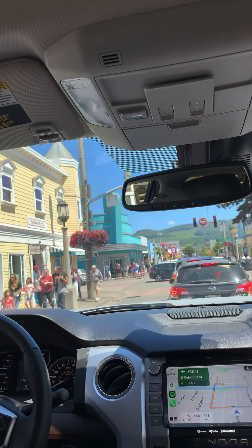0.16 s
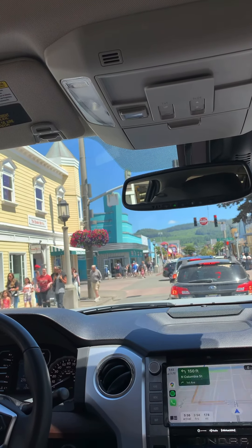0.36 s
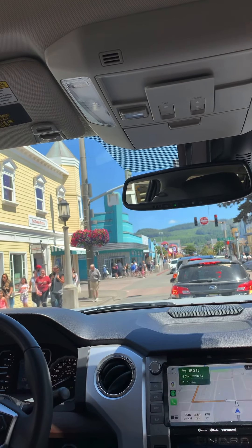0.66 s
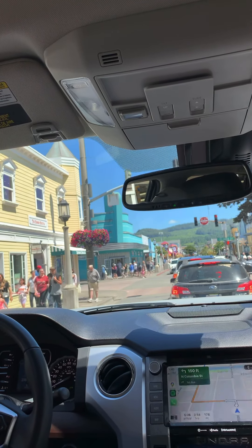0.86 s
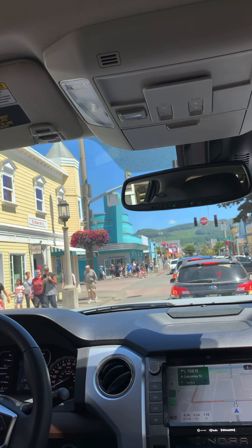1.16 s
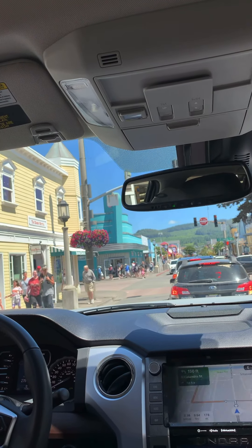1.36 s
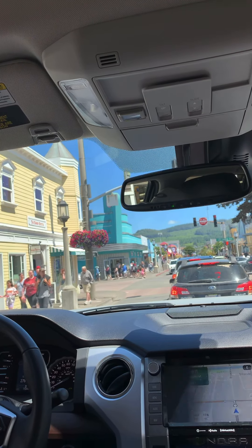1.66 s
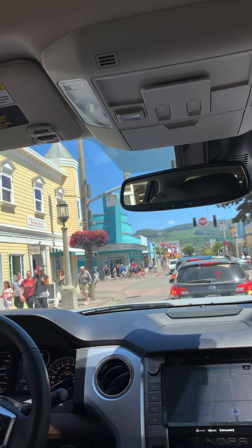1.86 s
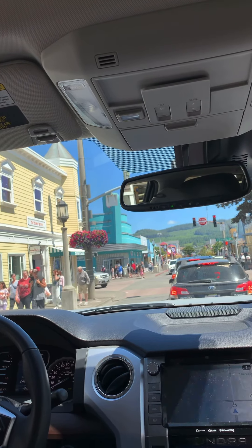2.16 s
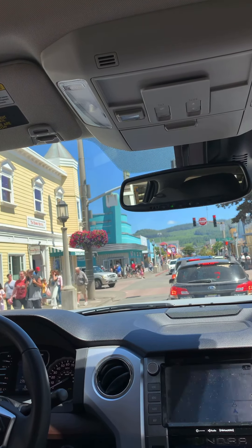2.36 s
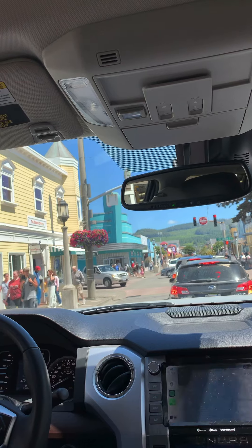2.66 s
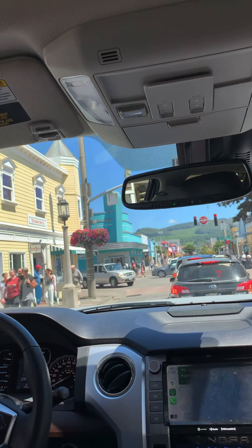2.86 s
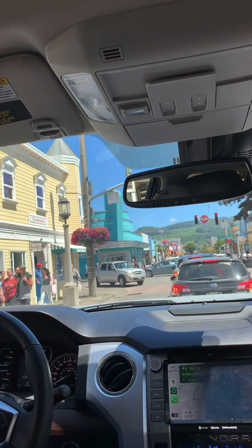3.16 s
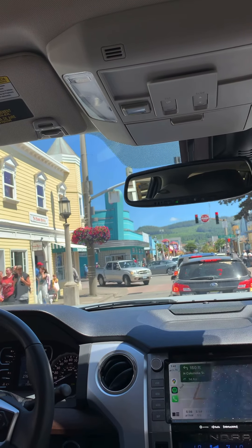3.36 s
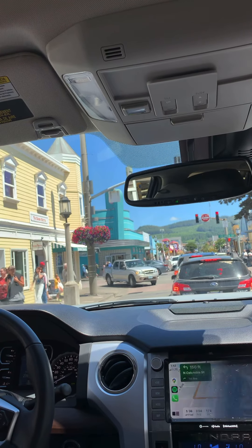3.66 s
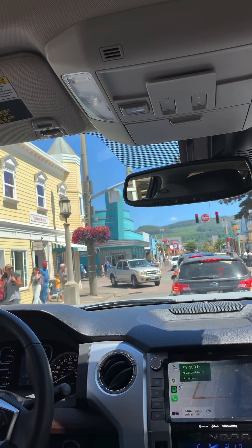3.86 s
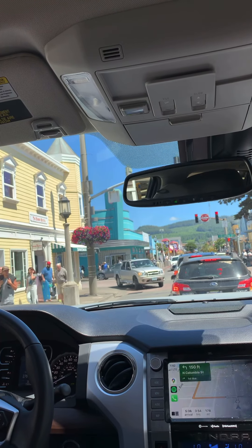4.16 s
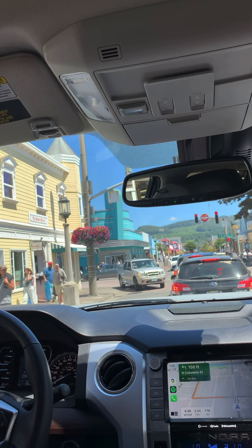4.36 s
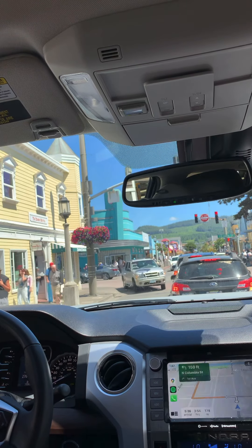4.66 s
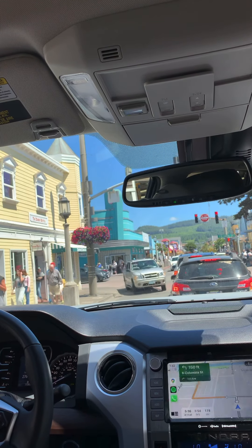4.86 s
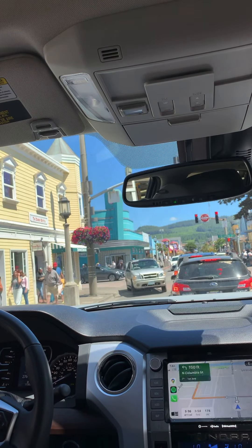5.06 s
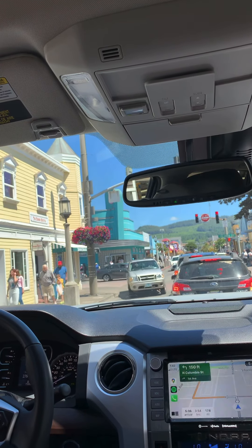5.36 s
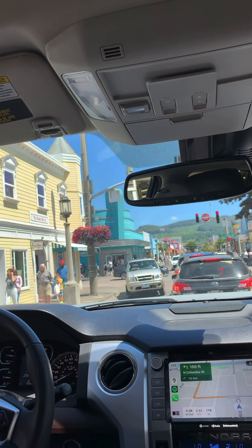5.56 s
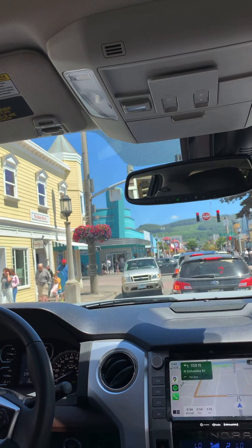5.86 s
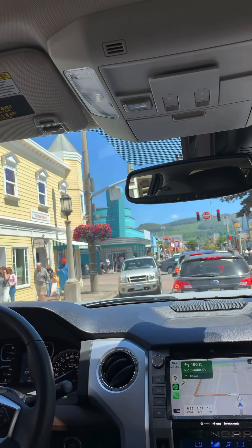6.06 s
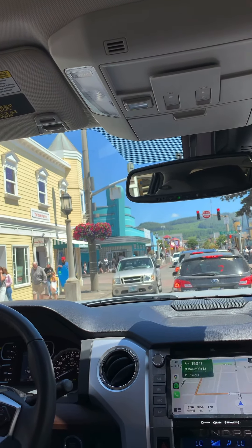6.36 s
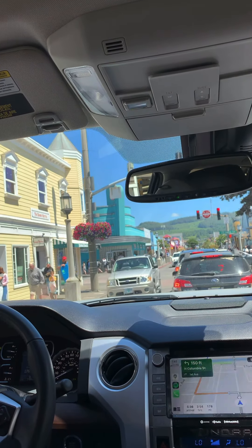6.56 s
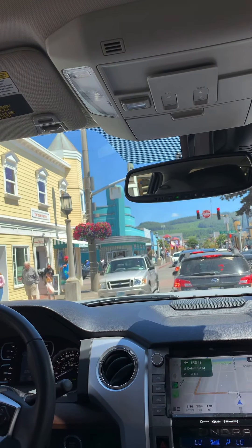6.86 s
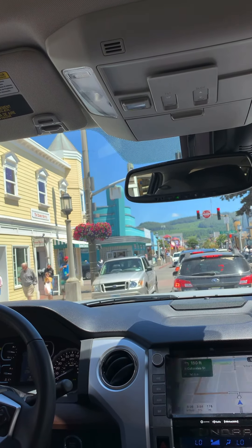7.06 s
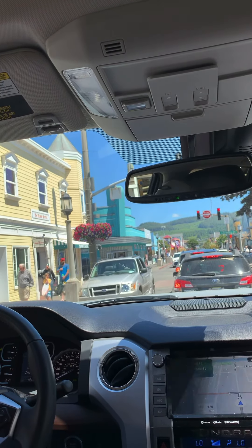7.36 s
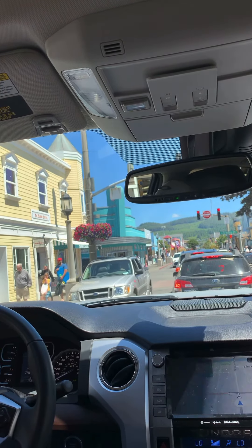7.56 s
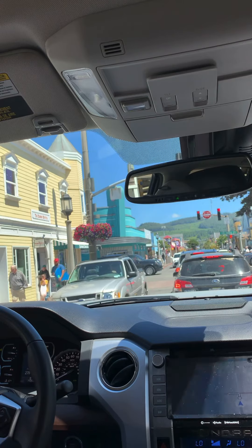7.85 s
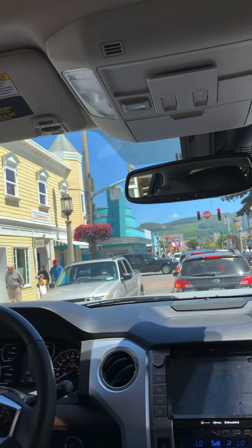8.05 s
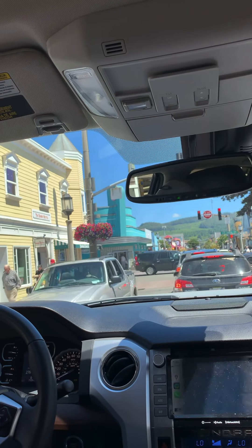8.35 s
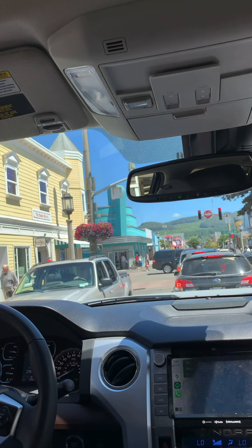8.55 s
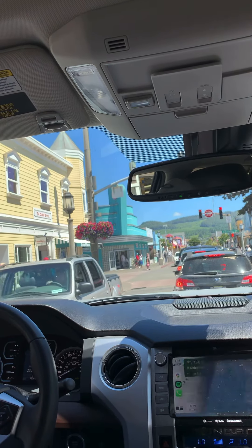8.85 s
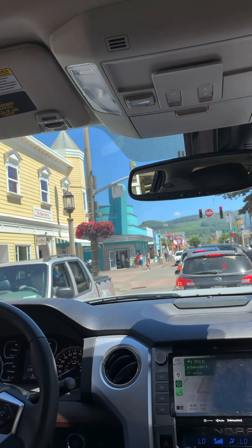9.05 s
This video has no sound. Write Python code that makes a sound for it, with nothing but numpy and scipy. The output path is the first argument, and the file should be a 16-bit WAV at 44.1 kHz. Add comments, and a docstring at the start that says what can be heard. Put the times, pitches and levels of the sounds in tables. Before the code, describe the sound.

Strong air-conditioning blower roars and hisses in a car cabin over a low engine hum, while a turn-signal relay ticks steadily.

```python
"""Inside a car cabin, heard at two microphone ports. From the start the air-conditioning blower booms, rushes and
hisses (shaped noise) and sings in its ducts (narrow-band noise), over the engine's firing tone and octave (sines).
From 0.15 s the turn-signal relay ticks steadily, each tick a cluster of decaying modes. Tiny squeaks (sine bursts)
sound near 3.74 s. At 4.42 s the engine sheds load: its tone quietens and sags in pitch. Another squeak sounds at
4.83 s, and from 5.2 s the octave fades."""
import sys
import numpy as np
from scipy import signal
from scipy.fft import rfft, irfft, next_fast_len
from scipy.io import wavfile
from scipy.ndimage import uniform_filter1d, map_coordinates

SR = 44100
rng = np.random.default_rng(int(sys.argv[2]) if len(sys.argv) > 2 else 0)


def wav_out(sig):
    """Save sig, one row per channel (or a flat mono array), as 16-bit PCM at SR to the path in sys.argv[1]."""
    wavfile.write(sys.argv[1], SR, np.round(np.clip(np.atleast_2d(sig).T, -1, 1) * 32767).astype(np.int16))


N = 406161

# Spectrum of the cabin boom. Each row: frequency in Hz, relative density in dB per Hz.
BOOM_SPECTRUM = [(15, -45), (25, -22), (41, -14.5), (54, -5.5), (75, -4), (102, -3), (118, 1), (150, -5.5),
                 (188, -2.5), (235, -8), (272, -7), (305, -12), (335, -13.5), (389, -20.5), (436, -16.5),
                 (476, -26.5), (500, -33.5), (650, -57), (1100, -120)]
# Spectrum of the vent rush. Each row: frequency in Hz, relative density in dB per Hz.
RUSH_SPECTRUM = [(280, -31), (480, -1), (530, -4), (580, -1), (700, -2), (832, -1), (880, -3.5),
                 (945, -9.5), (1050, -4), (1180, -5.5), (1370, -9.5), (1590, -9.5), (1770, -16.5),
                 (1850, -10.5), (2000, -10), (2180, -10.5), (2500, -14.5), (2940, -13), (3540, -16.5),
                 (4060, -19.5), (4900, -19), (5640, -19.5), (6300, -20.5), (7200, -26), (8200, -24),
                 (9500, -26), (12400, -63), (20900, -120)]
# Spectrum of the thinnest hiss. Each row: frequency in Hz, relative density in dB per Hz.
HISS_SPECTRUM = [(8000, -10.5), (10000, 0), (11700, -3.5), (13000, -2), (14000, -5.5), (14900, -18)]
# Duct resonances blown by the turbulence. Each row: frequency in Hz, width in Hz, level in dB,
# lag of the left port in radians, flutter depth in dB.
DUCT_MODES = [(434, 64, -60.5, 0.84, 1), (844, 110, -62, -1, -2), (1139, 61, -59.5, 0.084, 1),
              (1576.6, 74, -60.5, 0.66, 1.4), (2178, 254, -63.5, 0.23, 1.3), (2425, 110, -68.5, 0.5, 1),
              (2670, 120, -71.5, .5, 1.2), (3880, 190, -70, 1.1, 2), (4105, 180, -66.5, 1.57, 0),
              (6030, 320, -79.5, -0.35, 1.2)]
# Correlation of the turbulence at the two ports. Each row: frequency in Hz, left-right likeness from 0 to 1.
PORT_LIKENESS = [(60, .993), (200, .99), (300, .94), (440, .75), (600, .4), (800, .55), (1400, .55),
                 (2000, .7), (2800, .38), (4100, .45), (5500, .5), (7200, .3), (9000, .55), (10200, .85),
                 (11900, .97), (13000, .85)]
# Phase of the turbulence between the ports; in the treble the air path turns it steadily.
# Each row: frequency in Hz, lag of the left port in radians.
PORT_LAG = [(60, .26), (200, .15), (350, .9), (550, .3), (700, -1.2), (1100, 0), (1900, 1.2), (3000, 3.1),
            (4100, 5.9), (5500, 9.4), (7100, 12), (8800, 15.7), (10200, 18.85), (11900, 22), (13300, 25.1),
            (14800, 28.3)]
# Colour difference of the ports. Each row: frequency in Hz, left minus right in dB.
PORT_TILT = [(60, -1), (99, 2), (160, 1), (270, -0.5), (440, -1.5), (720, -2.5), (1190, -1.5), (1960, -0.5),
             (3220, 0.5), (5300, -3), (8720, -0.5), (14400, -0.5)]
# Modes of the relay and its housing. Each row: frequency in Hz, closing level in dB, opening level in dB,
# 60 dB decay time on closing in s, rise time in s, left minus right in dB, lag of the left port in radians,
# phase scatter in radians.
RELAY_MODES = [(2100, -57, -57, .06, .003, 0, .8, .8), (2390, -51.5, -54.5, .07, .004, -3.5, .6, .4),
               (2480, -57, -55, .07, .004, -3, .6, .4), (2570, -49, -46, .08, .004, 4.5, -1.3, .3),
               (2655, -49.5, -53, .08, .004, 4, 2.2, .3), (2725, -49, -51.5, .08, .004, -2, -1.9, .3),
               (2805, -50.5, -48, .08, .004, 5, 2.2, .3), (2950, -63, -50.5, .07, .004, -1, 0, .4),
               (3085, -46, -55, .09, .006, -1, .6, 2.5), (3190, -60, -57, .06, .003, 2, -1, .8),
               (3320, -60, -54.5, .06, .003, 1, -2, .8), (3480, -58.5, -68, .06, .004, -2, 0, .8),
               (8550, -65, -74, .04, .003, 1, 2.7, .5), (9200, -65, -74, .04, .003, 1, -2, .5),
               (9580, -64, -74, .04, .003, 0, -1.2, .5)]
# Tiny squeaks, stronger on the right. Each row: centre in s, frequency in Hz, level on the right in dB,
# half length in s.
SQUEAKS = [(3.741, 8400, -51, 0.0013), (3.746, 8400, -54, 0.0013), (4.83, 8500, -55, .004)]

# Blower: boom level, its change at unloading, its swell depth; knots a second of the swell and duct flutter
BOOM_DB, BOOM_UNLOAD_DB, BOOM_SWELL_DB = -33, -0.2, .3
BOOM_SWELLS_PER_S, FLUTTERS_PER_S = 9, 24
RUSH_DB, HISS_DB = -48.5, -66.0

# Engine: firing rate under load and after unloading, and the times of the change
LOADED_HZ, UNLOADED_HZ = 43.88, 37.5
UNLOAD_AT_S, UNLOAD_TAKES_S, SAG_TAKES_S = 4.42, 0.21, 1.8
FIRING_DB, FIRING_UNLOAD_DB, FIRING_SAG_DB = -43, -12, 1  # under load, change at unloading, change over the sag
OCTAVE_DB, OCTAVE_FADE_DB, OCTAVE_FADES_AT_S, OCTAVE_FADE_S = -43.5, -12, 5.2, 1  # holds, then fades
ENGINE_LAG_RAD = .26  # left behind right

# Relay: it closes first and opens one blink later
FIRST_TICK_S, BLINK_S = .1487, .350102
GATHER_S = .0035  # the modes swing together this long after the first touch
SETTLES_S, SETTLE_DB_PER_S = .017, 600  # the armature comes to rest and damps the ring
OPENS_EARLY_S, OPEN_RING_SHARE = .001, .65  # opening comes ahead of the beat and rings for a shorter time

TOP_HZ = 14955  # band limit


def amp(db):
    """The decibel law: amplitude gain of a level in dB."""
    return 10 ** (np.asarray(db) / 20)


def unit(x):
    """Normalisation by mean power: x at rms 1."""
    return x / np.sqrt(np.mean(x ** 2) + 1e-20)


def along(points, hz):
    """Interpolation of (Hz, value) points on a logarithmic frequency axis."""
    f, v = np.transpose(points)
    return np.interp(np.log(hz + 1), np.log(f + 1), v)


def wobble(rate):
    """Slow random modulation: a smooth curve through random knots, rate of them a second."""
    knots = rng.standard_normal(int(N * rate / SR) + 4)
    return map_coordinates(knots, [np.arange(N) * rate / SR])


def ramp(start_s, length_s):
    """Raised-cosine transition: 0 before the start, rising smoothly to 1."""
    u = np.clip((np.arange(N) / SR - start_s) / length_s, 0, 1)
    return (1 - np.cos(np.pi * u)) / 2


def filtered(x, response):
    """Linear filtering: the spectrum of x times a complex response of frequency."""
    m = next_fast_len(N + SR // 2)
    return irfft(rfft(x, m) * response(np.fft.rfftfreq(m, 1 / SR)), m)[..., :N]


def port_phases(lag):
    """Phase difference: half the lag goes to each port, the left one behind."""
    return np.exp(.5j * lag * np.array([[-1], [1]]))


def blower():
    """Broadband flow noise: low boom, vent rush and thin hiss; the boom eases a little at unloading."""
    boom_db = BOOM_DB + BOOM_UNLOAD_DB * ramp(UNLOAD_AT_S, UNLOAD_TAKES_S)
    boom_db += BOOM_SWELL_DB * wobble(BOOM_SWELLS_PER_S)
    boom = amp(boom_db) * turbulence(BOOM_SPECTRUM, patchy_db=0.13)
    rush = amp(RUSH_DB + 0.083 * wobble(9)) * turbulence(RUSH_SPECTRUM, patchy_db=1.65)
    hiss = amp(HISS_DB) * turbulence(HISS_SPECTRUM, patchy_db=1.5)
    return boom + rush + hiss


def turbulence(spectrum, patchy_db):
    """Partial coherence: patchy stereo noise of rms 1, partly alike at the ports and shifted in phase."""
    z = signal.stft(rng.standard_normal((2, N)), nperseg=512)[2]
    field = rng.standard_normal(z.shape[1:])
    field = uniform_filter1d(field, 3, axis=0)  # smooth over frequency
    field = uniform_filter1d(field, 8, axis=1)  # smooth over time
    pair = signal.istft(z * amp(patchy_db * unit(field)), nperseg=512)[1][:, :N]

    def mid_side(hz):
        # Mid and side powers cos^2 and sin^2 leave a left-right correlation of cos(2 * angle)
        angle = np.arccos(np.clip(along(PORT_LIKENESS, hz), -1, 1)) / 2
        return amp(along(spectrum, hz)) * [np.cos(angle), np.sin(angle)]

    mid, side = filtered(pair, mid_side)
    left_right = np.array([mid + side, mid - side])
    return unit(filtered(left_right, lambda hz: port_phases(along(PORT_LAG, hz))))


def ducts():
    """Resonance: each duct narrows noise to a fuzzy tone; the ports share it but for a phase lag."""
    out = np.zeros((2, N))
    for mode_hz, width_hz, db, lag, flutter_db in DUCT_MODES:
        def response(hz):
            damping = 1j * hz * width_hz
            peak = damping / (mode_hz * mode_hz - hz * hz + damping)
            return peak ** 2 * port_phases(lag)  # squared for steep flanks

        level = amp(db + flutter_db * wobble(FLUTTERS_PER_S))
        out += level * unit(filtered(rng.standard_normal(N), response))
    return out


def engine():
    """Periodic forcing: the firing tone and its octave shake the body, a little unsteadily."""
    sag = ramp(UNLOAD_AT_S, SAG_TAKES_S)
    hz = LOADED_HZ + (UNLOADED_HZ - LOADED_HZ) * sag
    phase = 2 * np.pi * np.cumsum(hz * (1 + 0.0016 * wobble(3.11))) / SR
    lag = ENGINE_LAG_RAD / 2 * np.array([[-1], [1]])

    firing_db = FIRING_DB + FIRING_UNLOAD_DB * ramp(UNLOAD_AT_S, UNLOAD_TAKES_S) + FIRING_SAG_DB * sag
    octave_db = OCTAVE_DB + OCTAVE_FADE_DB * ramp(OCTAVE_FADES_AT_S, OCTAVE_FADE_S)
    firing = amp(firing_db + 0.49 * wobble(4)) * np.sin(phase + lag)
    octave = amp(octave_db + 2.4 * wobble(9)) * np.sin(2 * phase + lag)
    return np.sqrt(2) * (firing + octave)  # the levels are rms


def relay():
    """Modal excitation: closing and opening ring the same modes at different, slightly varying strengths."""
    out = np.zeros((2, N + SR))
    t = np.arange(SR // 10) / SR
    hz, close_db, open_db, t60, rise_s, pan_db, lag, scatter = np.transpose(RELAY_MODES)[:, :, None]
    port = np.array([.5, -.5])[:, None, None]  # left, right
    rise = 1 - np.exp(-t / rise_s)  # the dashboard and the cabin echoes soften the attack
    settle_db = SETTLE_DB_PER_S * np.maximum(t - SETTLES_S, 0)
    for k, tick_s in enumerate(np.arange(FIRST_TICK_S, N / SR, BLINK_S)):
        opens = k % 2
        size, shift = rng.standard_normal((2, len(RELAY_MODES), 1))
        fade_db = 60 * t / (t60 * OPEN_RING_SHARE ** opens) + settle_db
        strike_db = (close_db, open_db)[opens] + 1.1 * size + port * pan_db
        level = amp(strike_db - fade_db) * rise
        ring = np.sin(2 * np.pi * hz * (t - GATHER_S) + scatter * shift + (.5 - port) * lag)
        start = round((tick_s - opens * OPENS_EARLY_S) * SR)
        out[:, start:start + len(t)] += np.sum(level * ring, axis=1)
    return out[:, :N]


def squeaks():
    """Gaussian tone bursts: very short high squeaks, weaker on the left."""
    t = np.arange(N) / SR
    mono = np.zeros(N)
    for centre_s, hz, db, half_s in SQUEAKS:
        envelope = np.exp(-((t - centre_s) / half_s) ** 2)
        mono += amp(db) * envelope * np.sin(2 * np.pi * hz * t)
    return mono * amp([[-9], [0]])  # left, right


def scene():
    """Superposition: the pressures of all the sources add."""
    return blower() + ducts() + engine() + relay() + squeaks()


def record(dry):
    """Frequency response: the two ports differ a little in colour and pass nothing above the band limit."""
    def response(hz):
        half_tilt_db = along(PORT_TILT, hz) / 2
        return amp(half_tilt_db * [[1], [-1]]) * (hz < TOP_HZ)

    return filtered(dry, response)


dry = scene()
out = record(dry)
wav_out(out)
```